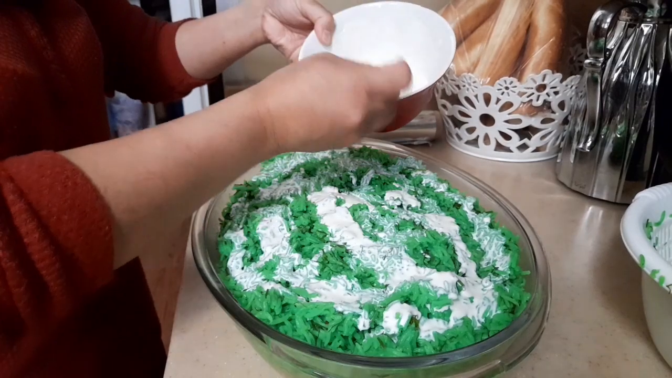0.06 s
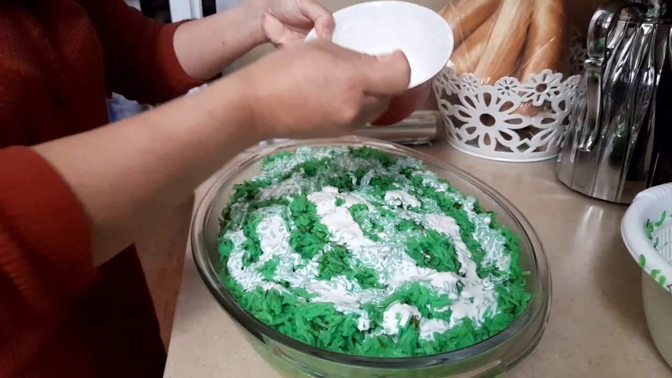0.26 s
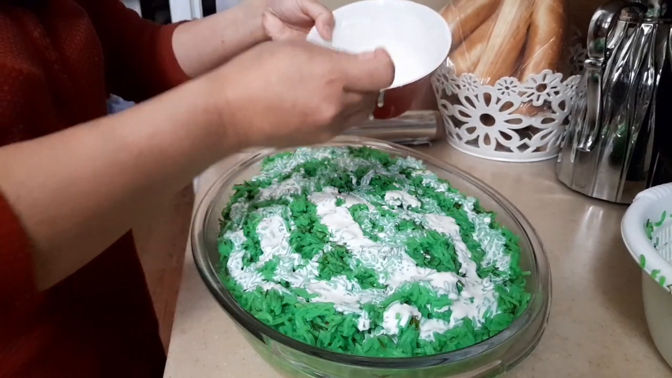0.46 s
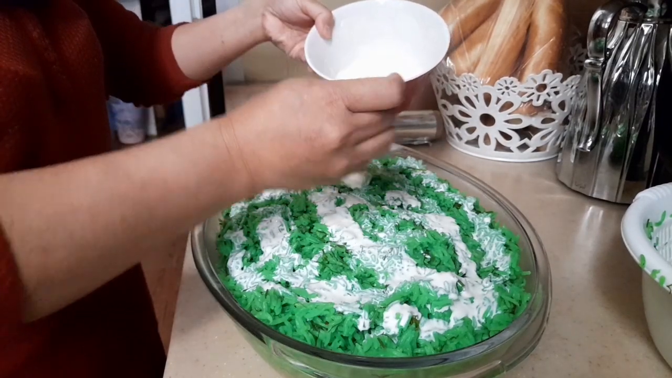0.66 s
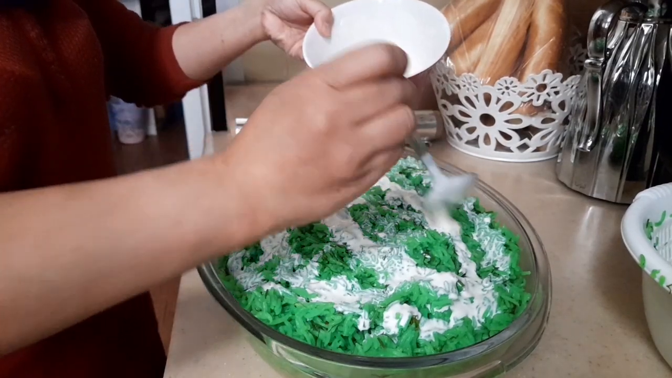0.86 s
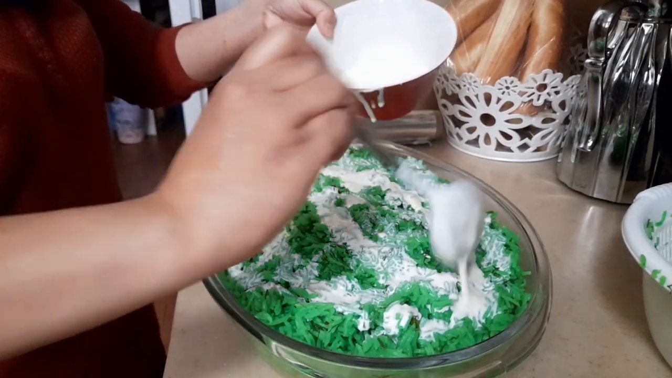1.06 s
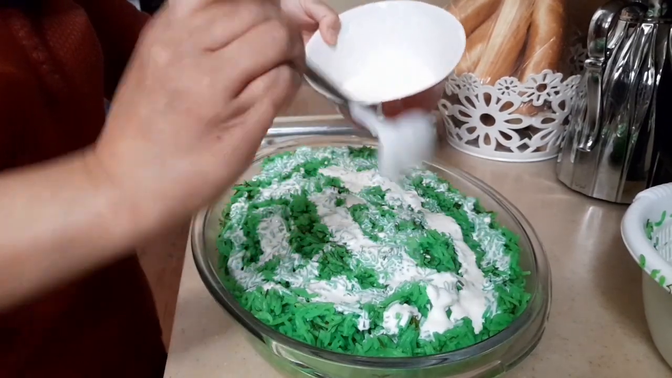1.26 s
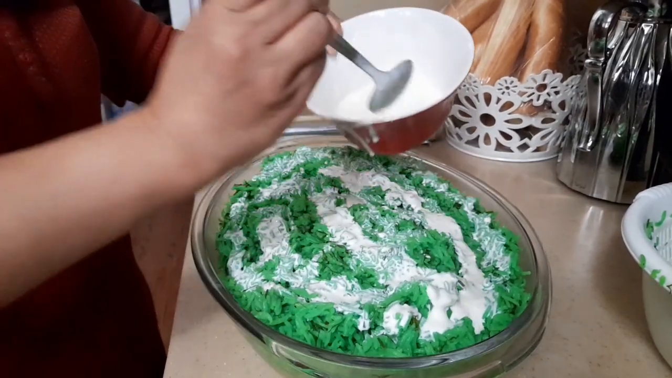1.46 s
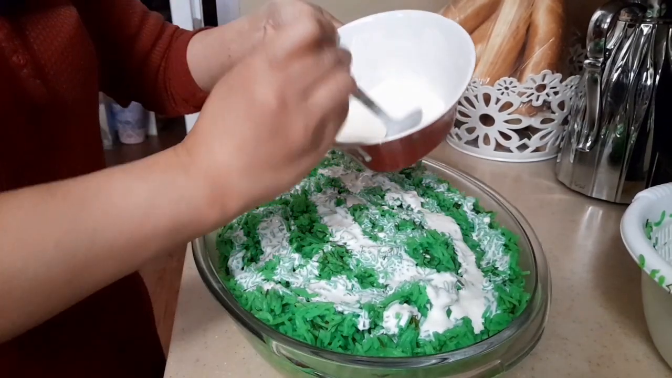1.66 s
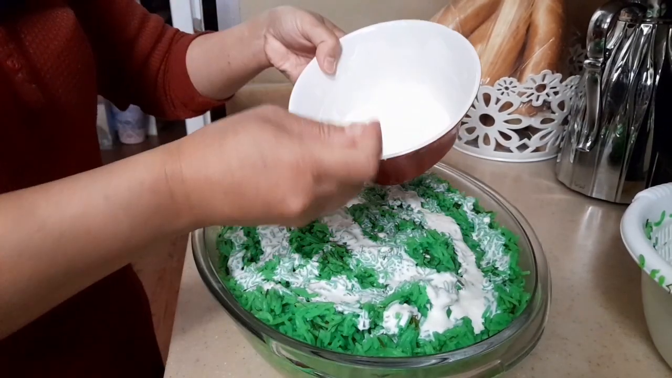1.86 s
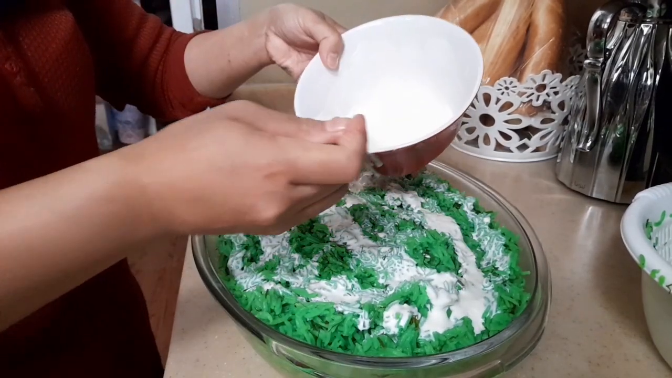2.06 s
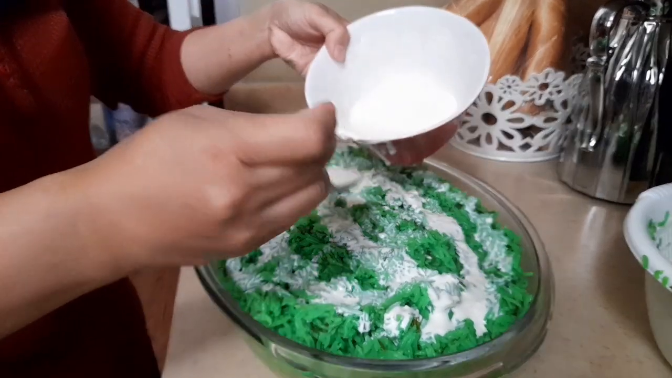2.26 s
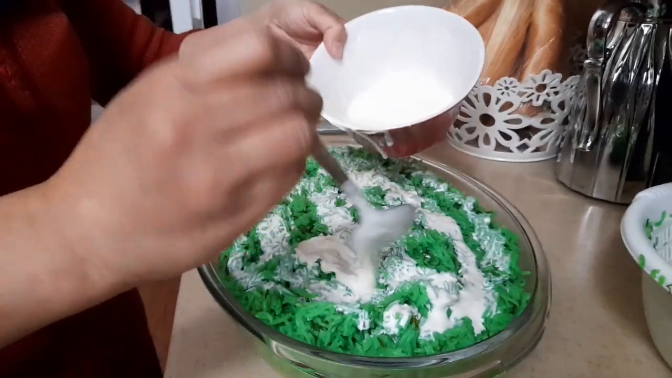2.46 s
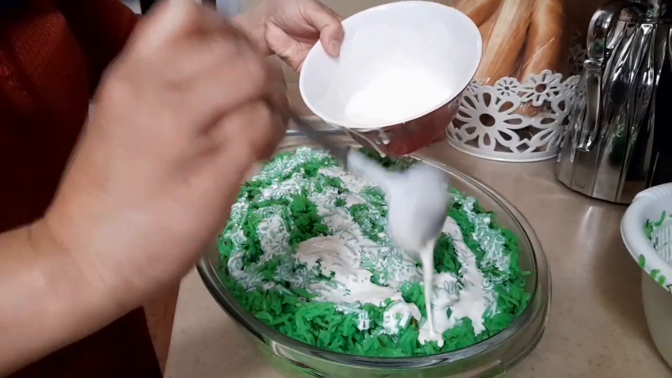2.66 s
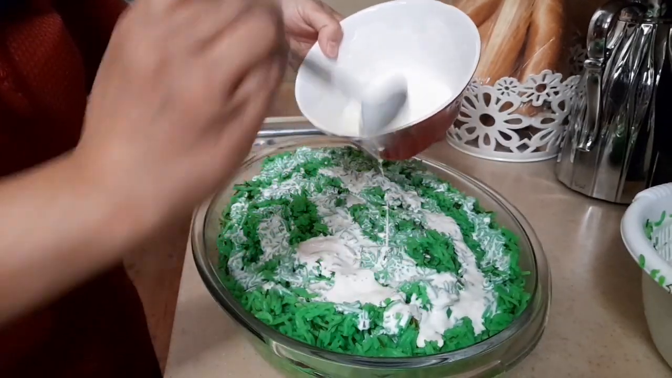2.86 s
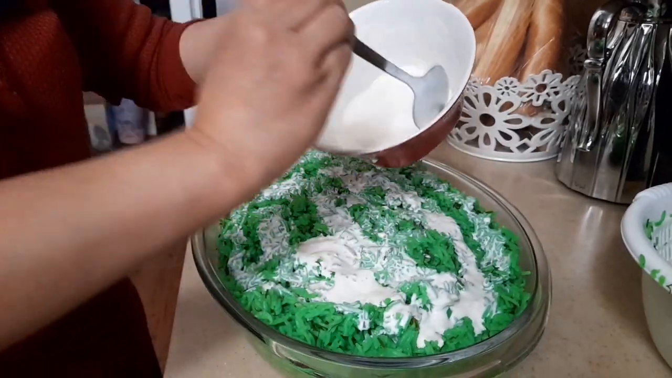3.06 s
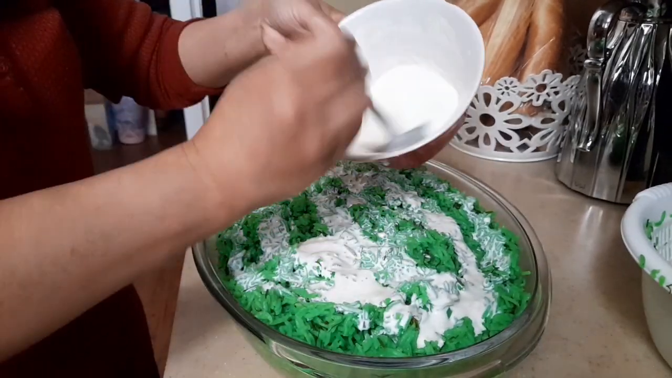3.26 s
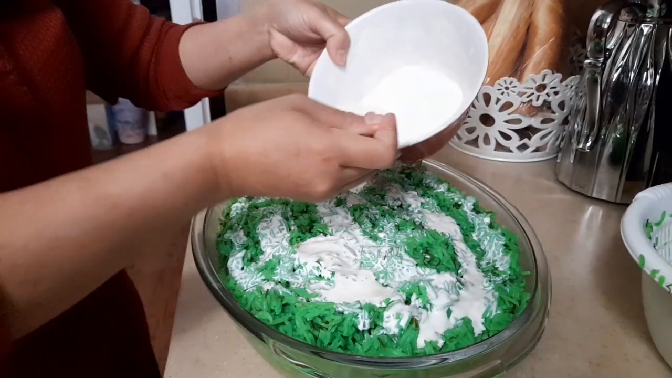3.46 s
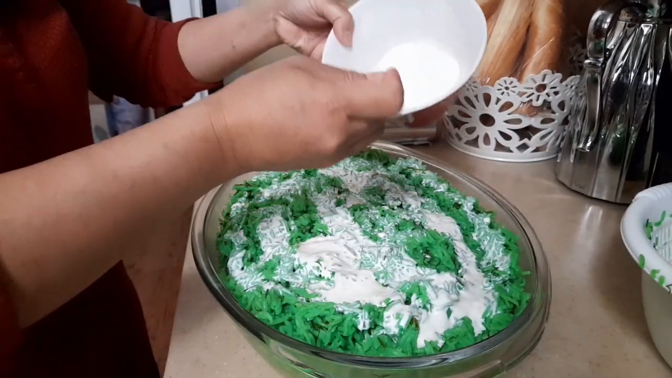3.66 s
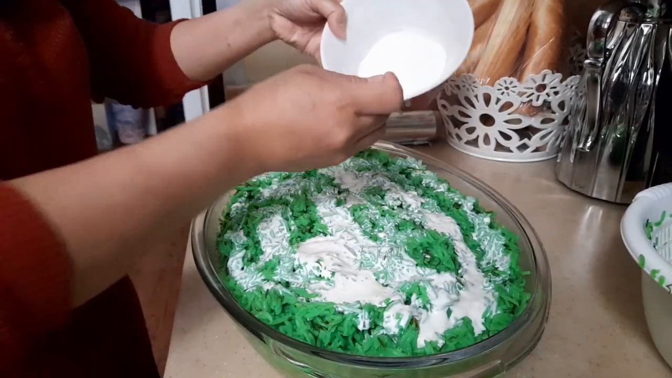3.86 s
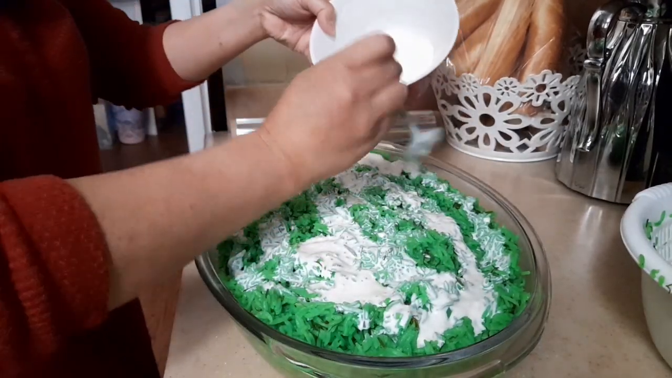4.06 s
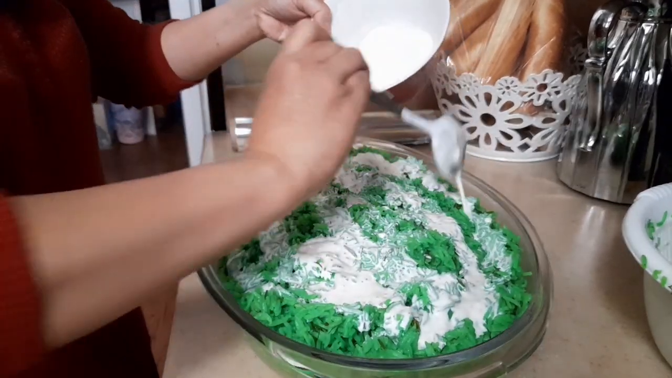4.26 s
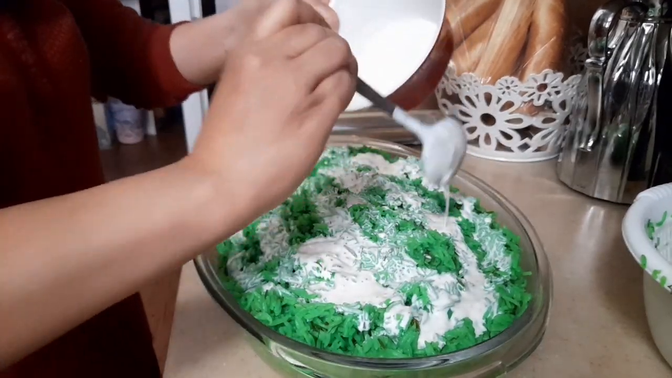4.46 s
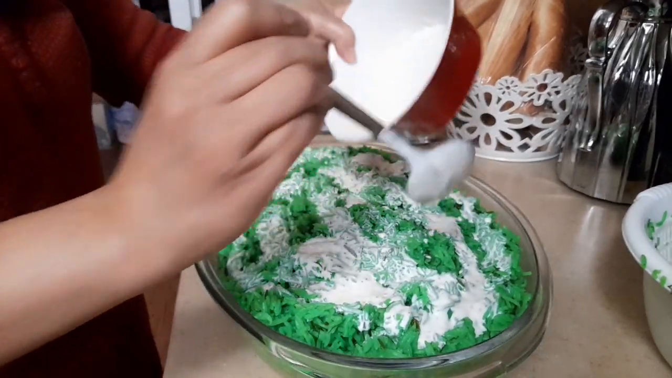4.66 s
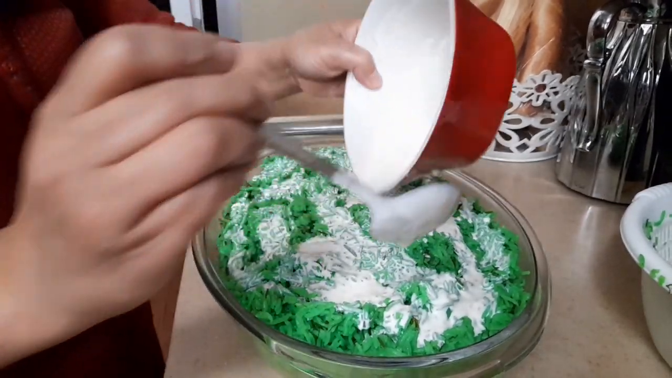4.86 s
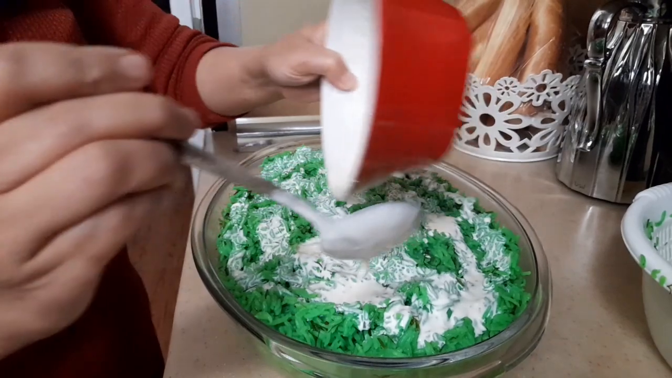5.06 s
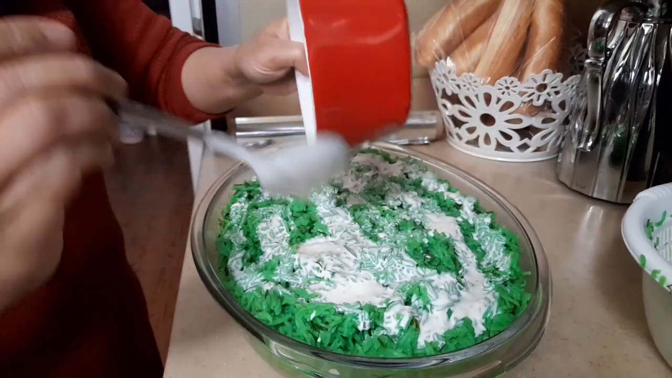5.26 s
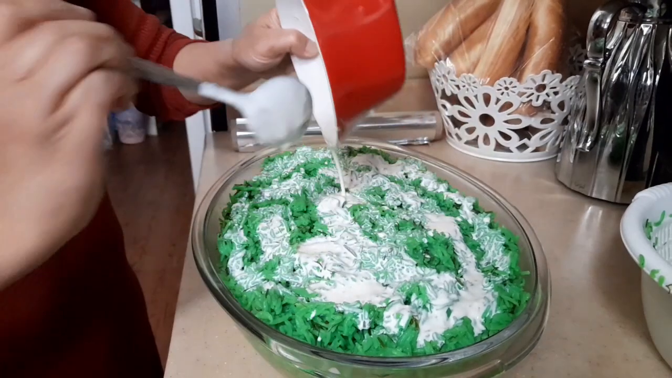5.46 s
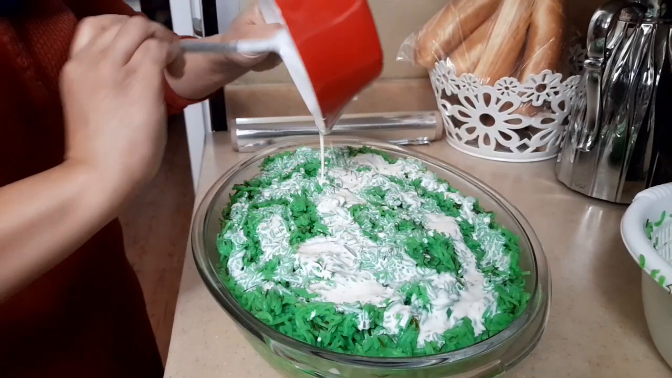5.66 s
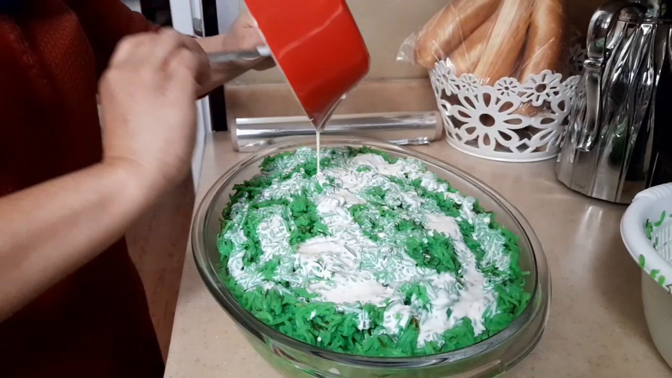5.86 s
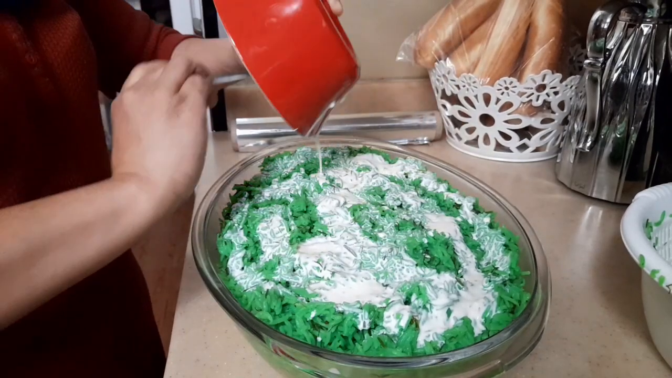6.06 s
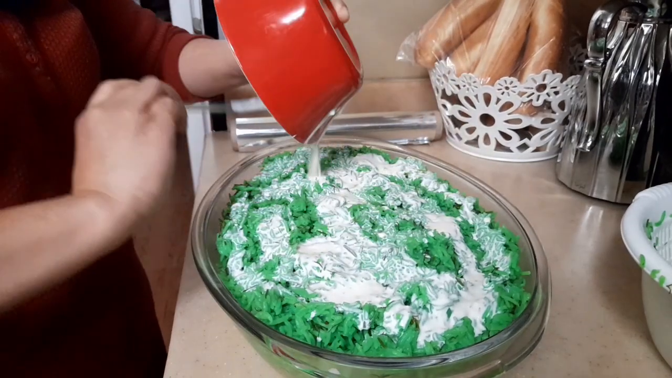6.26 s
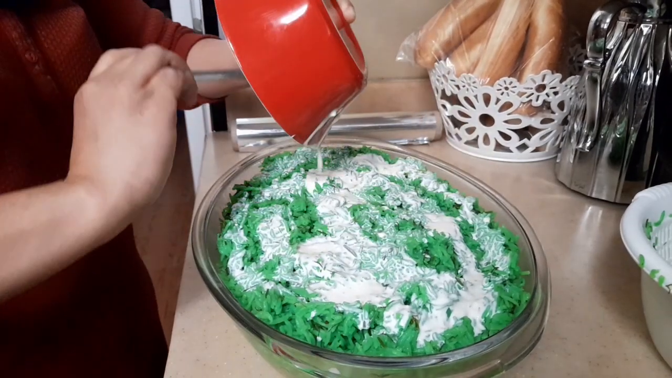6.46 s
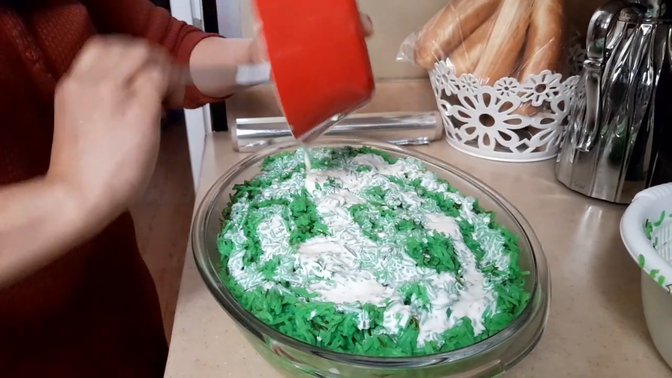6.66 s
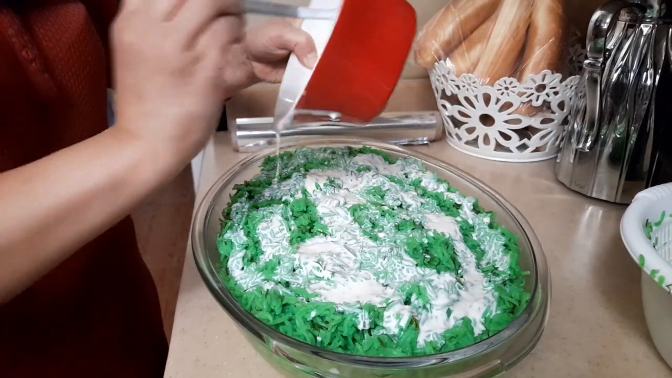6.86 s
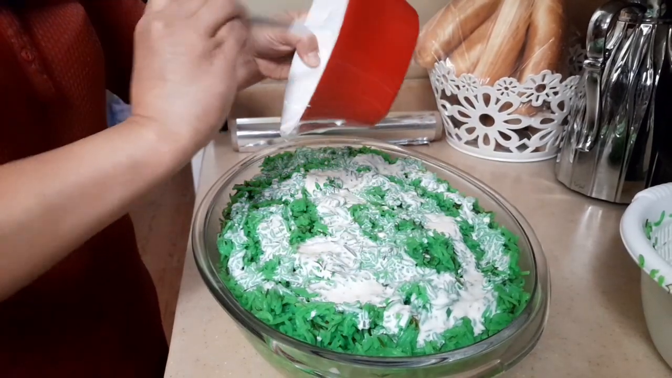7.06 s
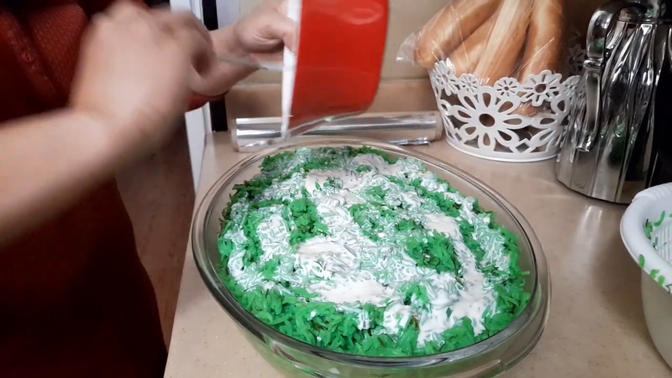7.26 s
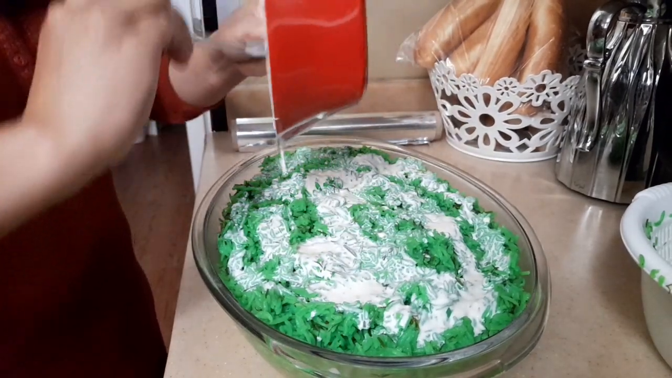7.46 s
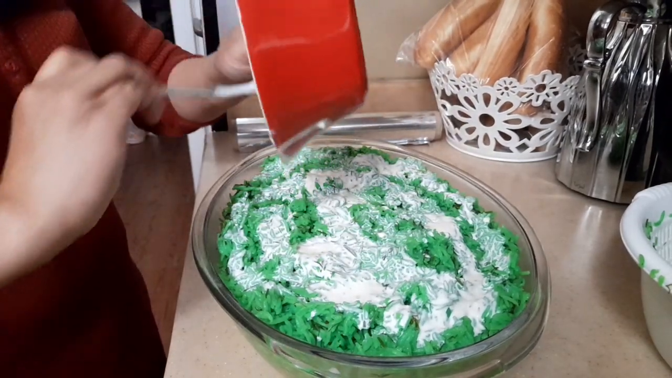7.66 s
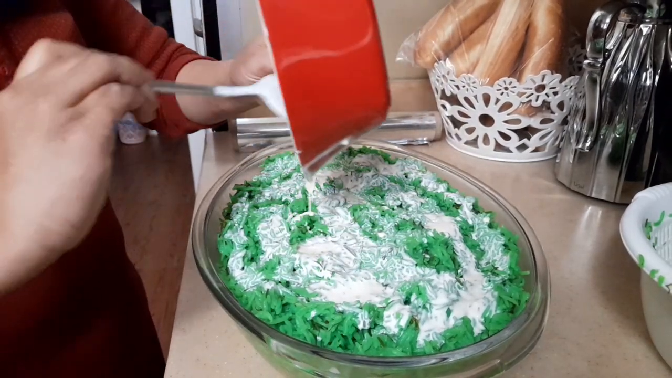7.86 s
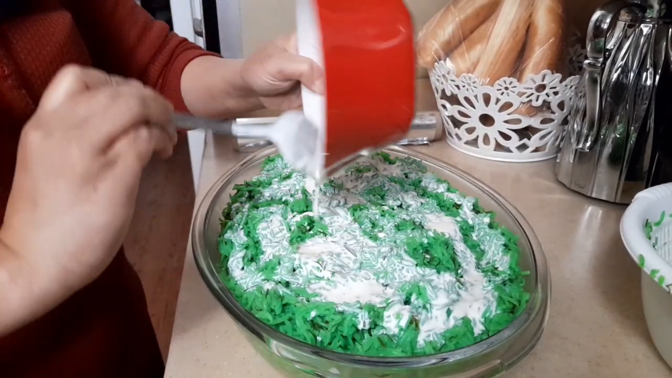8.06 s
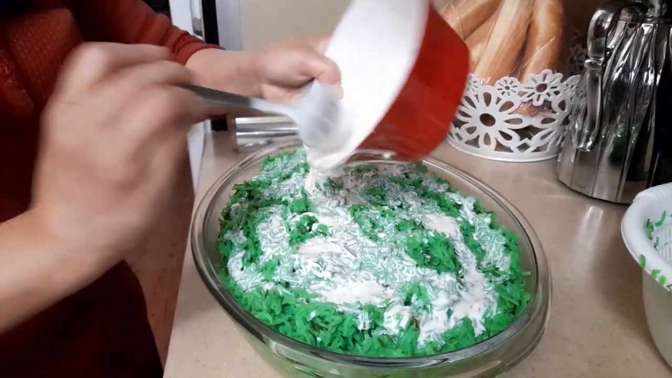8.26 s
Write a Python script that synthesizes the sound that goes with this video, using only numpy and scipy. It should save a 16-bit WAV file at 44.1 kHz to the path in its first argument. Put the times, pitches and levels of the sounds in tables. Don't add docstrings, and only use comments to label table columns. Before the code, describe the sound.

Scattered bright taps and short gritty scrapes of a spoon on a small glazed bowl, with dull soft thuds and a faint motor hum behind.

```python
import sys
import numpy as np
from scipy import signal
from scipy.fft import rfft, irfft, next_fast_len
from scipy.io import wavfile
from scipy.ndimage import uniform_filter1d

SR = 44100
rng = np.random.default_rng(int(sys.argv[2]) if len(sys.argv) > 2 else 0)


def store_pcm(level_fs):
    pcm = np.round(np.clip(level_fs, -1, 1) * 32767).astype(np.int16)
    wavfile.write(sys.argv[1], SR, np.atleast_2d(pcm).T)


def ratio_of_db(decibels):
    return 10 ** (np.asarray(decibels, float) / 20)


N = 367027
STEP = 32

# start in seconds, wall tone peak in dB, then rim tone, hollow and brightness
# in dB against the wall tone.
BLOWS = [(1.6684, -31.5, -14.5, -10.5, 1), (3.07, -35.5, -22, -4, -7.5), (3.1881, -29.5, -11, -9, 1.5),
         (3.6624, -22.5, -13.5, -10, -16.5), (5.7479, -38, -2, -4, 6.5), (6.4627, -34.5, -13, 0, 4.5),
         (6.75, -45, -4.5, -5, -2.5), (6.8591, -30.5, -20.5, -11.5, -5.5), (7.355, -36.5, -21.5, -17, -2),
         (7.476, -25, -10.5, 2, -5.5), (7.7001, -30, -4, -6.5, -18), (7.9479, -26, -18, -7.5, -6.5),
         (8.303, -19.5, -16.5, -10.5, -6.5)]
CATCHES = [
    (2.1081, -45.5, -3.5, 8.5, -27),
    (2.119, -33.5, -9, -5.5, -23),
    (6.0777, -63, 15.5, 12, -23),
    (7.0989, -48, -11, 1, -9),
    (7.623, -55, -8, 9, -9),
]
# time in seconds, favoured hollow pitch in Hz, favoured wall pitch in Hz.
CONTACT = [(1.69, 3280, 6100), (1.86, 3230, 5010), (3.15, 3150, 5600), (3.2, 2170, 6070),
           (3.33, 3087, 6520), (3.6, 3150, 5060), (5.7, 3150, 5130), (5.77, 2300, 6000), (6.05, 2870, 6340),
           (6.5, 2770, 6060), (6.8, 2950, 5170), (6.95, 2080, 6970), (7.14, 2653, 5220), (7.4, 2780, 5900),
           (7.54, 2460, 5500), (7.67, 3130, 5270), (7.95, 3200, 5200), (8.12, 2230, 5760)]
PARTS_HZ = [1900, 3800, 5900, 8100]


def unit(x):
    return x / np.sqrt(np.mean(x ** 2) + 1e-20)


def along(points, hz):
    f, v = np.transpose(points)
    return np.interp(np.log(hz + 1), np.log(f + 1), v)


def curves(rows, outside=None):
    s, *cols = np.transpose(rows)
    return np.array([np.interp(np.arange(N) / SR, s, c, outside, outside) for c in cols])


def stretched(slow):
    return np.repeat(slow, STEP, axis=-1)[..., :N]


def wobble(rate):
    knots = rng.standard_normal(int(N * rate / SR) + 2)
    return np.interp(np.arange(N) * rate / SR, np.arange(len(knots)), knots)


def held(start, hold, rise, fall):
    t = np.arange(0, N, STEP) / SR
    return -rise * np.maximum(start - t, 0) - fall * np.maximum(t - start - hold, 0)


def filtered(x, response):
    m = next_fast_len(N + SR // 2)
    return irfft(rfft(x, m) * response(np.fft.rfftfreq(m, 1 / SR)), m)[..., :N]


def ring(force, hz, t60):
    r, w = ratio_of_db(-60 / (t60 * SR)), 2 * np.pi * hz / SR
    return signal.lfilter([np.sin(w)], [1, -2 * r * np.cos(w), r * r], force)


def favour(octaves):
    return ratio_of_db(-14 * np.minimum(octaves ** 2, 1))


def sides(lean_db, lead):
    left = ratio_of_db(lean_db / 2) * np.exp(.5j * lead)
    right = ratio_of_db(-lean_db / 2) * np.exp(-.5j * lead)
    return np.array([left, right])


def patchy(x, depth_db, centre_hz=None, octaves=1):
    hz, t, z = signal.stft(x, SR, nperseg=256)
    field = uniform_filter1d(rng.standard_normal(z.shape), size=3, axis=0)
    field = uniform_filter1d(field, size=14, axis=1)
    if centre_hz is not None:
        centre = np.interp(t, np.arange(len(centre_hz)) * STEP / SR, centre_hz)
        z = z * favour(np.log2((hz[:, None] + 1) / centre) / octaves)
    return signal.istft(z * ratio_of_db(depth_db * unit(field)), nperseg=256)[1][:N]


def rush(spectrum):
    # pitch in Hz, likeness of the two ports from 0 to 1 (below 0 counts as 0).
    alike = [(60, 0.03), (180, 0.71), (550, 0.38), (1650, -0.27), (4970, 0.0085), (15000, 0.039)]
    # pitch in Hz, left over right in dB.
    port_lean = [(60, -19), (180, -1.5), (550, 0), (1650, 0), (4970, -3), (15000, -0.5)]

    def mid_side(hz):
        angle = np.arccos(np.clip(along(alike, hz), 0, 1)) / 2
        return ratio_of_db(along(spectrum, hz)) * np.array([np.cos(angle), np.sin(angle)])

    mid, side = filtered(rng.standard_normal((2, N)), mid_side)
    noise = np.array([mid + side, mid - side]) / np.std(mid)
    return filtered(noise, lambda hz: sides(along(port_lean, hz), 0))


def fridge():
    # time in seconds, motor in dB, second order in dB.
    hum = [(0.0, -66.5, -54), (1.27, -62, -55.5), (1.62, -55.5, -53), (2.08, -57.5, -65),
           (3.01, -76, -67.5), (3.22, -53.5, -49.5), (3.59, -63, -67), (3.78, -61.5, -53), (4.54, -63, -58),
           (4.77, -51, -53.5), (5.86, -71, -56), (6.37, -63, -72.5), (6.56, -54, -58), (6.72, -57.5, -69),
           (7.11, -52.5, -48.5), (7.48, -58, -57.5), (8.13, -52.5, -47), (8.32, -58.5, -57)]
    # multiple of the motor speed, level in dB.
    overtones = [(4, -76), (7, -73.5)]
    # start in seconds, hold in seconds, level in dB.
    sings_at = [(0.394, 0.083, -87), (1.968, 0.61, -58), (3.244, 0.32, -61.5), (3.896, 0.47, -63),
                (4.72, .3, -63.5), (6.896, 0.3, -61), (7.6, 0.086, -60.5), (8.1, 0.082, -67)]
    # pitch in Hz, level in dB per Hz.
    rumble_colour = [(26, -29), (45, -13.5), (122, -4.5), (176, -10.5), (223, -9), (278, -11.5), (406, -12),
                     (1010, -23), (1170, -31), (1500, -27.5), (1950, -57), (3300, -120)]
    hiss_colour = [(470, -14), (800, -5.5), (1020, -1), (1230, -13.5), (1590, -9), (2290, -10.5),
                   (2730, -26.5), (3430, -13.5), (4830, -16.5), (6070, -13.5), (9100, -25), (15100, -15.5),
                   (15900, -32.5), (16500, -33)]
    motor_hz, rumble_level_db, hiss_db = 58.5, -59.5, -74
    sing_db_per_s = 67

    first_db, second_db = curves(hum)
    swing_db = first_db + second_db - np.mean(first_db + second_db)
    rumble_db = rumble_level_db + 0.14 * swing_db + 2.5 * wobble(3.4)

    turn = 2 * np.pi * np.cumsum(motor_hz + 0.2956 * wobble(3)) / SR
    tone = ratio_of_db(first_db + 2.0) * np.sin(turn)
    tone += ratio_of_db(second_db + 2.5 + 2.44 * wobble(6)) * np.sin(2 * turn + 0.23 * wobble(8.9))
    sings = sum(ratio_of_db(db + held(s, hold, sing_db_per_s, sing_db_per_s)) for s, hold, db in sings_at)
    tone += stretched(sings) * ratio_of_db(-4.5 + 1.5 * wobble(5.1)) * np.sin(8 * turn)
    for order, db in overtones:
        tone += ratio_of_db(db + 3 * wobble(1.8)) * np.sin(order * turn)

    hiss = ratio_of_db(hiss_db + 0.27 * (rumble_db - rumble_db.mean())) * rush(hiss_colour)
    hiss += ratio_of_db(hiss_db - 9) * unit(ring(rng.standard_normal((2, N)), 2750, 0.016))
    return tone * ratio_of_db([[-3], [2.4]]) + ratio_of_db(rumble_db + 1.0) * rush(rumble_colour) + hiss


def drags():
    # start in seconds, hold in seconds, wall tone in dB,
    # then rim tone and hollow in dB against it.
    stroke_rows = [(0.0, .03, -56.5, -8, -11.5), (1.635, 0.0072, -59, -11, -8),
                   (1.82, 0.038, -66.5, 0, -0.5), (2.02, 0.029, -60, -19, -17),
                   (2.105, 0.018, -46.5, 7, 6.5), (2.165, 0.015, -42, -16, -7),
                   (3.13, 0.064, -60.5, -3.5, -5), (3.269, 0.067, -49, -11.5, -6.5),
                   (3.438, 0.035, -67, -6, -3), (3.701, 0.014, -43, -5, -10.5),
                   (3.78, 0.016, -61.5, -16, -6), (5.705, 0.044, -62, -7.5, -6.5),
                   (5.82, 0.099, -55.5, -3, 0.5), (6.087, .03, -64, 23, 16.5),
                   (6.13, 0.06, -48.5, -4, -2.5), (6.531, 0.044, -45, -7, -4), (6.912, 0.061, -49.5, -7, 2),
                   (7.0, 0.088, -48.5, -11, -15), (7.094, 0.0058, -43, -0.5, 4),
                   (7.13, 0.031, -33, -11, 11), (7.43, 0.011, -57, -14, -7), (7.56, 0.22, -54, -3, 13.5),
                   (7.701, 0.0041, -36, 4.5, 4.5), (8.019, 0.094, -43, -13, -8.5)]
    skid_db = [-10, -5, -13, -18]
    press_db_per_s, lift_db_per_s = 345.5, 380
    skid_after_s, skid_fall_db_per_s = 0.011, 376
    edge_hz, edge_db_per_octave = 7310, 27

    t = np.arange(0, N, STEP) / SR
    pressure = np.zeros((4, len(t)))
    for s, hold, db, rim_db, hollow_db in stroke_rows:
        level_db = np.c_[[db + rim_db, db + hollow_db, db, db]]
        last_blow = max([0] + [row[0] for row in BLOWS if row[0] < s])
        next_blow = min([N / SR] + [row[0] for row in BLOWS if row[0] > s])
        free = (t - .004 >= last_blow) & (t < next_blow)
        pressure += ratio_of_db(level_db + held(s, hold, press_db_per_s, lift_db_per_s)) * free
    wall_hz = curves(CONTACT)[1, ::STEP]
    pressure[3] *= ratio_of_db(edge_db_per_octave * np.log2(wall_hz / edge_hz))
    for s, db, rim_db, hollow_db, bright_db in BLOWS + CATCHES:
        level_db = db + np.c_[np.add(skid_db, [rim_db, hollow_db, 0, bright_db])]
        pressure += ratio_of_db(level_db + held(s + skid_after_s, 0, 9000, skid_fall_db_per_s))

    pressure = uniform_filter1d(stretched(pressure), size=300)
    clumps = ratio_of_db(1.5 * rng.exponential(size=N) + 2.5 * wobble(160) + 2 * wobble(45))
    return pressure * unit(clumps * rng.standard_normal((4, N)))


def ringing(hit, rub):
    bowl_hz = [1475, 1553, 1635, 1740, 2100, 2230, 2395, 2545, 2945, 3165, 3198, 4550, 5045, 5105, 5270,
               6585, 6990, 7190]
    # level in dB, time to fall 60 dB in seconds.
    bowl_ring = [(-23.5, 0.0539), (7, 0.042), (-5, 0.047), (-14, .05), (0.5, 0.036), (-3.5, 0.051),
                 (-15.5, 0.0698), (-17.5, 0.03), (-16, 0.017), (-7.5, 0.01), (-2, 0.051), (-8, 0.017),
                 (-10.5, 0.041), (-9, 0.082), (-15, 0.017), (-2.5, 0.024), (-10, 0.15), (-4.5, 0.027)]
    # pitch in Hz, level in dB, time to fall 60 dB in seconds.
    spoon = [(9420, -19, .04), (10020, -17, .04), (11150, -17, .04), (11800, -16, .04), (12680, -15, .05),
             (13900, -18, .04), (15440, -16, .05)]

    rasp = ratio_of_db([[-23], [-22], [-23], [-23], [-26]]) * rub
    hollow_hz, wall_hz = curves(CONTACT)[:, ::STEP]
    modes = [(hz, *rest) for hz, rest in zip(bowl_hz, bowl_ring)] + spoon
    drift = uniform_filter1d(rng.standard_normal((2, len(modes), len(wall_hz))), size=110)
    lucks = unit(drift[0])
    aims = unit(uniform_filter1d(drift[1], size=400))

    both, apart = np.zeros((2, N))
    for (hz, db, t60), luck, aim in zip(modes, lucks, aims):
        part = np.searchsorted(PARTS_HZ, hz)
        from_rim = np.log2(hz / 1690) / 0.18
        from_hollow = np.log2(hz / hollow_hz) / .25
        from_wall = np.log2(hz / wall_hz) / .2
        distance = [from_rim, from_hollow, from_wall, from_wall, 0][part]
        dragged = ratio_of_db(db + 3.6 * luck) * favour(distance)
        struck = ratio_of_db(db - 4 + 2 * luck) * favour(np.log2(hz / 3180) / .4 * (part == 1))
        tone = ring(stretched(struck) * hit[part] + stretched(dragged) * rasp[part], hz, t60)
        both += tone
        apart += tone * stretched(.45 * np.tanh(aim))
    return filtered(np.array([both, apart]), lambda hz: (1j * hz / (1100 + 1j * hz)) ** 3)


def contact_noise(hit, rub):
    # pitch in Hz, level in dB per Hz.
    grit_colour = [(350, -37.5), (600, -25), (1230, -10), (3170, -7.5), (3960, -7.5), (5150, -7.5),
                   (5750, -9), (6790, -7.5), (8250, -16.5), (10000, -13), (15400, -16.5), (16500, -50.5)]

    def bands(hz):
        above = [1 / (1 + (edge / (hz + 1)) ** 16) for edge in PARTS_HZ]
        return -np.diff([hz ** 0, *above, 0 * hz], axis=0) * ratio_of_db(along(grit_colour, hz))

    def grit_bands(hz):
        return bands(hz) / (1 + (1150 / (hz + 1)) ** 4)

    click = filtered(ratio_of_db([[21], [19], [22], [19], [30]]) * hit, bands).sum(0)
    grit = filtered(ratio_of_db([[-3], [6], [5], [3], [14]]) * rub, grit_bands)
    hollow_hz = curves(CONTACT)[0, ::STEP]
    noise = click + patchy(grit[[0, 2, 3, 4]].sum(0), depth_db=6.0)
    noise += patchy(grit[1], depth_db=7.5, centre_hz=hollow_hz, octaves=0.32)
    return noise + ratio_of_db(-16) * ring(hit[3], 830, .022)


def ticks():
    # start in seconds, peak in dB, pitch in Hz.
    snaps = [
        (0.5644, -59.5, 7030),
        (0.9157, -53, 5600),
        (1.04, -47.5, 9100),
        (2.4478, -62, 11600),
        (4.0002, -57, 4960),
        (4.163, -57.5, 7100),
    ]
    out, t = np.zeros(N + SR), np.arange(SR // 4) / SR
    for s, db, hz in snaps:
        snap = ratio_of_db(-60 * t / 0.023) * rng.standard_normal(len(t))
        out[round(s * SR):][:len(t)] += ratio_of_db(db - 8.0) * ring(snap, hz, 0.0011)
    return out[:N]


def thuds():
    # start in seconds, peak in dB, time to fall 60 dB in seconds (held to at most 0.35).
    pushes = [
        (1.542, -27, 1.2),
        (3.184, -48, 2.0),
        (6.458, -34.5, 0.3),
        (7.947, -44.5, 0.82),
    ]
    out, t = np.zeros(N + SR), np.arange(SR // 4) / SR
    for s, db, t60 in pushes:
        puff = ratio_of_db(-60 * t / np.clip(t60, .03, .35)) * (1 - np.exp(-t / .002))
        dull = unit(ring(ring(rng.standard_normal(len(t)), 150, .012), 480, 0.014))
        rough = unit(np.gradient(ring(rng.standard_normal(len(t)), 700, 0.006)))
        out[round(s * SR):][:len(t)] += puff * (ratio_of_db(db - 11) * dull + ratio_of_db(db - 28.5) * rough)
    return out[:N]


def blows():
    edge_under_db = 4
    force, t = np.zeros((5, N + SR)), np.arange(SR // 10) / SR
    for s, db, rim_db, hollow_db, bright_db in BLOWS + CATCHES:
        fade = 0.41 * ratio_of_db(-60 * t / 0.019) + 0.29 * ratio_of_db(-60 * t / 0.082)
        jolt = fade * rng.standard_normal(len(t))
        jolt[0] = 1
        parts_db = [rim_db - 6.5, hollow_db - 7, -6, bright_db - 7, bright_db - edge_under_db - 3.5]
        parts = ratio_of_db(db + np.array(parts_db))
        force[:, round(s * SR):][:, :len(t)] += parts[:, None] * jolt
    return force[:, :N]


def bowl():
    # time in seconds, left over right in dB.
    sway = [(1.5, 0.5), (2.14, -6.5), (2.3, -5.5), (3.44, -9), (3.49, -3), (7.31, -2.0), (7.33, -8),
            (8.24, 0.5), (8.32, -3.5)]
    hit = blows()
    rub = drags()[[0, 1, 2, 2, 3]]
    both, apart = ringing(hit, rub)
    both += contact_noise(hit, rub)
    pan_db = curves(sway)[0]
    pan_db = 0.391 * (pan_db - pan_db.mean()) + 0.7
    return np.array([both + apart, both - apart]) * ratio_of_db([pan_db, -pan_db])


def kitchen(x):
    # pitch in Hz, time to fall 60 dB in seconds.
    echo_times = [(300, 0.13), (2000, 0.37), (6000, 0.27), (15000, 0.35)]
    hz, t, z = signal.stft(rng.standard_normal((2, SR // 2)), SR, nperseg=256)
    fade = ratio_of_db(-60 * t / along(echo_times, hz)[:, None])
    tail = signal.istft(z * fade, SR, nperseg=256)[1]
    tail = tail / np.linalg.norm(tail[0])
    late = np.pad(x, (200, 0))[None]
    return signal.fftconvolve(late, tail, axes=1)[:, :N]


def scene():
    # pitch in Hz, left over right in dB.
    bowl_lean = [(60, -6), (130, -3), (290, 2), (640, 6), (1410, -3.5), (3100, -4.5), (6820, -8),
                 (15000, -1)]
    # pitch in Hz, left ahead of right in radians.
    bowl_lead = [(0, 2.5), (2240, 0.736), (4480, -2.5), (6460, -13), (7060, -3.5), (8870, -12.5),
                 (10100, -3), (11300, 8), (12600, 6), (16500, 14.5)]
    # pitch in Hz, width in Hz, depth from 0 to 1.
    notch_hz, width_hz, depth = (8250, 1200, .93)

    def notch(hz):
        band = 1j * hz * width_hz
        return 1 - depth * band / (notch_hz * notch_hz - hz * hz + band)

    near = filtered(bowl() + ticks() + thuds(), notch)
    direct = filtered(near, lambda hz: sides(along(bowl_lean, hz), along(bowl_lead, hz)))
    return direct + ratio_of_db(-9) * kitchen(near.mean(0)) + fridge()


def band_limit(x):
    return signal.sosfilt(signal.butter(12, 16880, fs=SR, output="sos"), x)


def record(dry):
    mix = filtered(dry, lambda hz: 1 - .9 / (1 + (15950 / (hz + 1)) ** 120))
    return band_limit(mix)


dry = scene()
out = record(dry)
store_pcm(out)
```